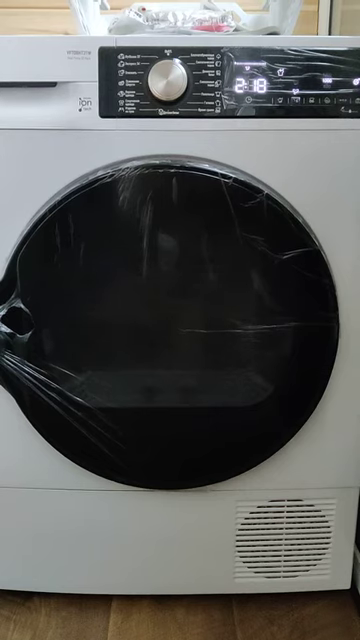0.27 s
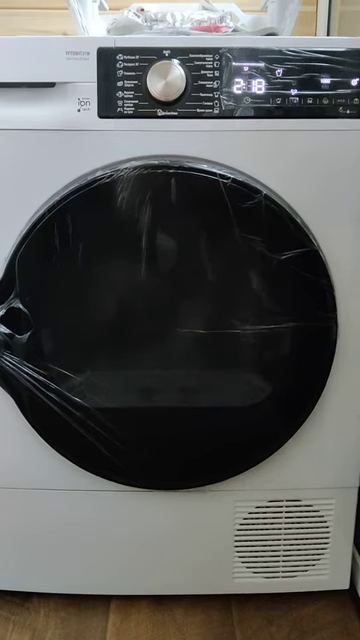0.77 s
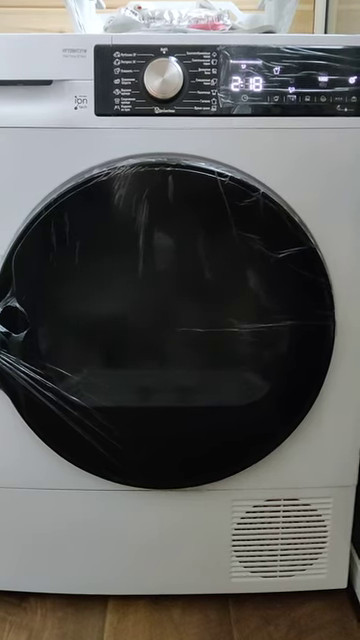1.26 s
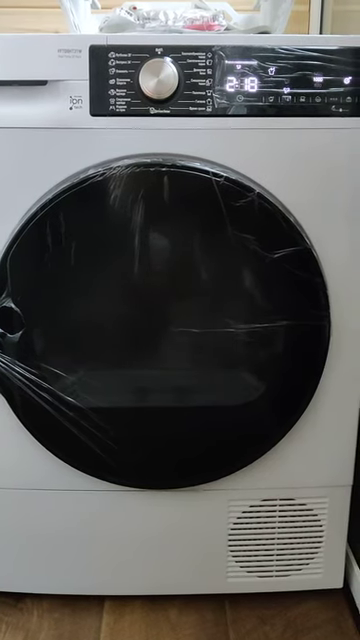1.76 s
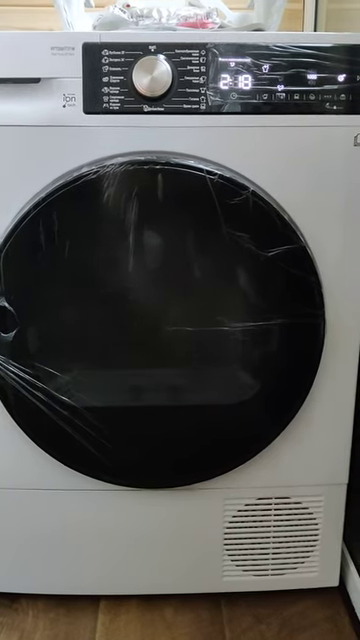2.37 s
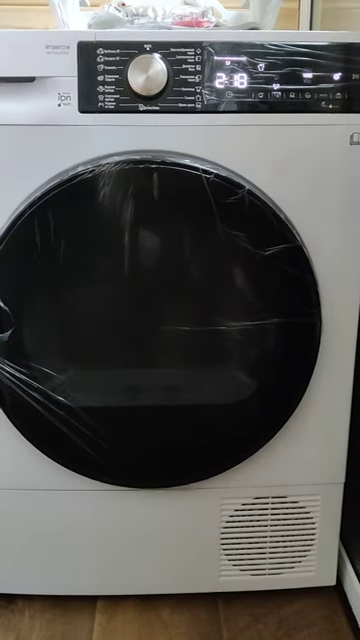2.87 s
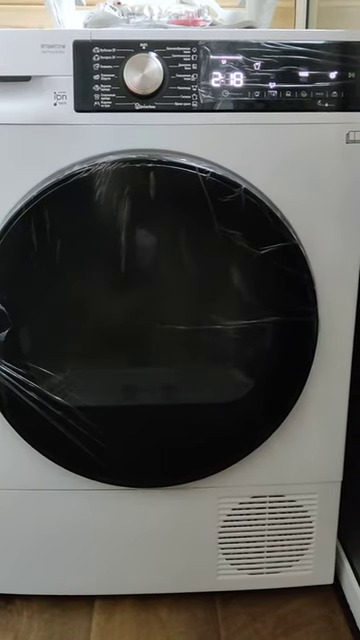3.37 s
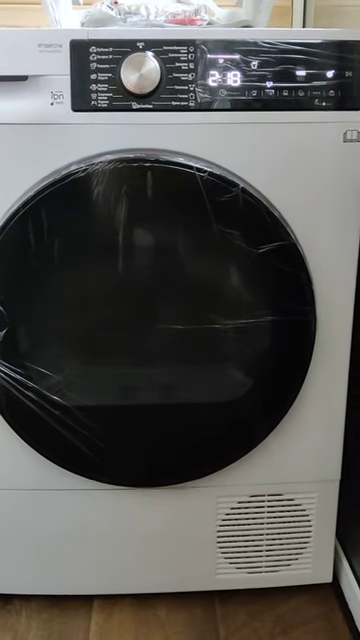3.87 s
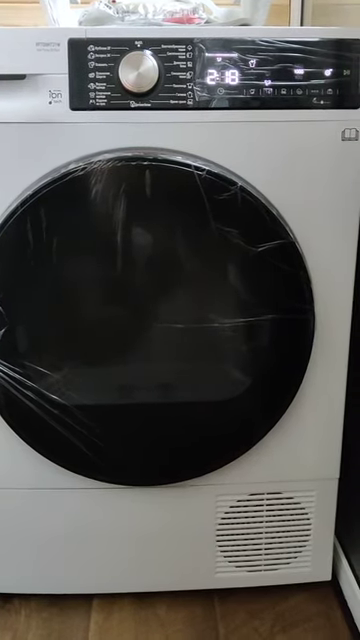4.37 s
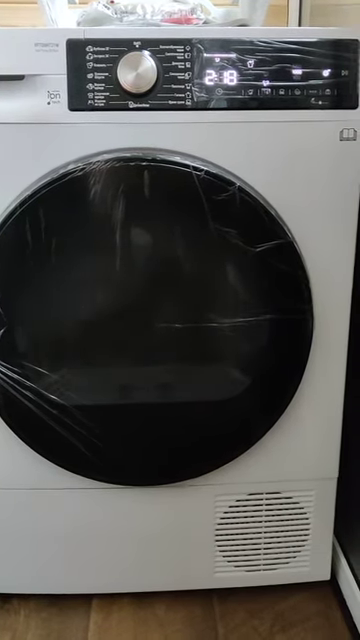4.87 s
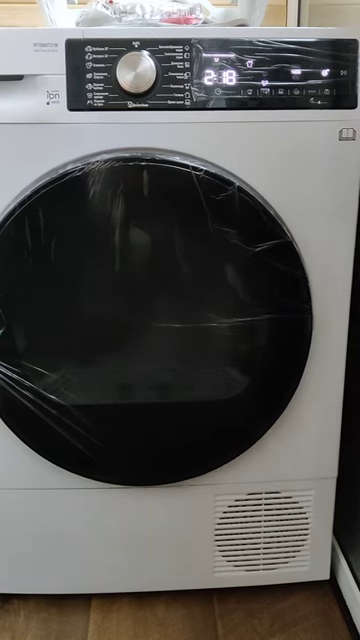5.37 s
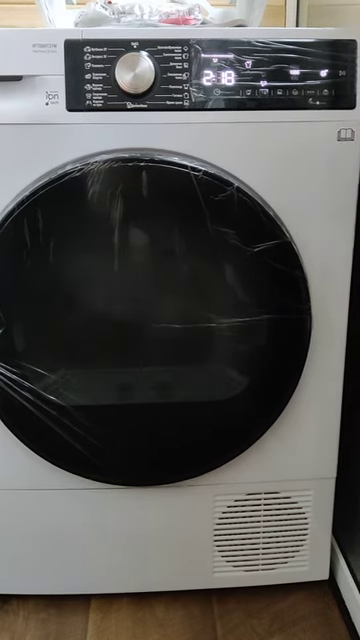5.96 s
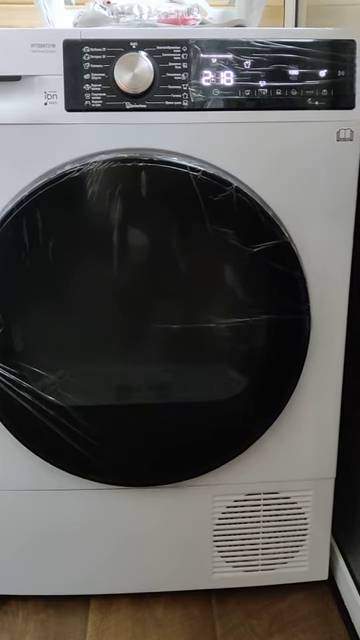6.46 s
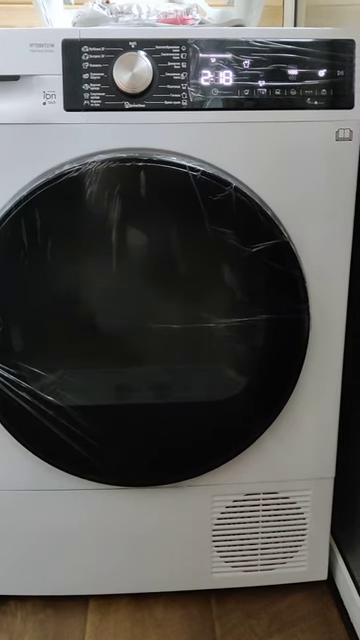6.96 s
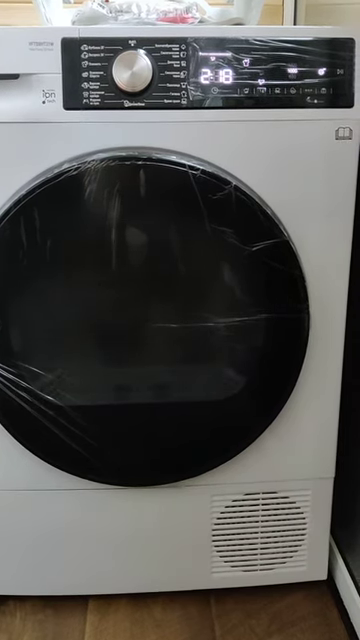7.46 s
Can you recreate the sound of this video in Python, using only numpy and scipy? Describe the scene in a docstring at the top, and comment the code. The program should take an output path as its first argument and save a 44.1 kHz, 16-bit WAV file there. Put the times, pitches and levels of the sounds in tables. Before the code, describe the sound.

A heat-pump clothes dryer runs steadily in a small room, heard by a stereo phone close in front. After a quick fade from silence, a deep boomy throb swells about three times a second as wet laundry drops in the drum. Under and around it lie motor hum and a soft, dark rush of air; a faint, thin high whine sits mostly on the right. One small dry tick comes late.

```python
"""A low, throbbing boom and a broad rush of air fade in: a heat-pump clothes dryer in a small room.
The drum's boom swells at each drop of the laundry and is made of two low tones of wandering pitch.
The rush of air is shaped noise, some of it ringing in cabinet, ducts and room; a thin whistle is narrow noise.
The compressor hums and whines in tones on multiples of its shaft speed, and one dry tick is a sudden step.
A phone with two microphones hears it all."""
import sys
import numpy as np
from scipy import signal
from scipy.fft import rfft, irfft, next_fast_len
from scipy.io import wavfile
from scipy.ndimage import uniform_filter1d, map_coordinates

SR = 44100
rng = np.random.default_rng(int(sys.argv[2]) if len(sys.argv) > 2 else 0)


def put_to_file(sound):
    """Save the sound as 16-bit audio at rate SR, in the file named by the first command-line argument."""
    columns = np.atleast_2d(sound).T  # one column per channel
    safe = np.clip(columns, -1, 1)
    whole_steps = np.round(safe * 32767)
    wavfile.write(sys.argv[1], SR, whole_steps.astype(np.int16))


N = 339570

# The stronger tones of the compressor's whine. Each row: multiple of the shaft speed, middle level in dB,
# left-right difference in dB, lead of the left side in turns.
WHINE_TONES = [(58, -63.5, -12.4, -0.38), (59, -55.9, -12.4, 0.45), (60, -76.0, 10.0, 0.09),
               (61, -76.5, -3.1, -0.3), (65, -75.9, -8.3, 0.26), (67, -77.5, -7.7, 0.18),
               (82, -77.9, 8.5, -0.12), (86, -81.1, 3.7, 0.35), (89, -79.9, -4.4, 0.27),
               (94, -78.4, 15.0, 0.42), (95, -78.7, 2.9, 0.29), (96, -78.9, 0.1, 0.45),
               (98, -73.3, -2.9, 0.27), (99, -73.4, -1.8, 0.42), (100, -80.7, -5.0, 0.44),
               (102, -74.1, -11.3, 0.21), (103, -74.0, 6.9, -0.12), (106, -79.7, -6.6, -0.41),
               (107, -79.0, 5.1, -0.07), (108, -78.1, 5.7, 0.21), (109, -80.7, 15.0, -0.21),
               (138, -81.3, 2.7, 0.38), (325, -84.8, -1.1, -0.05), (326, -86.6, 6.8, 0.42)]


def amp(db):
    """Turn decibels into gain."""
    return 10 ** (np.asarray(db) / 20)


def unit(x):
    """Scale x to an rms (average strength) of 1."""
    return x / np.sqrt(np.mean(x ** 2) + 1e-20)


def along(points, hz):
    """Read a curve of (Hz, value) points, joined by straight lines on a logarithmic frequency axis."""
    point_hz, values = np.transpose(points)
    return np.interp(np.log(hz + 1), np.log(point_hz + 1), values)


def curves(rows):
    """Draw one curve over time, sample by sample, for each column after the seconds."""
    seconds, *columns = np.transpose(rows)
    now = np.arange(N) / SR
    return [np.interp(now, seconds, column) for column in columns]


def wobble(rate):
    """Draw a smooth random curve through the given number of random points a second."""
    points = rng.standard_normal(int(N * rate / SR) + 4)
    return map_coordinates(points, [np.arange(N) * rate / SR])


def filtered(x, response):
    """Multiply the spectrum of x by a response that depends on frequency."""
    size = next_fast_len(N + 8192)
    spectrum = rfft(x, size) * response(np.fft.rfftfreq(size, 1 / SR))
    return irfft(spectrum, size)[..., :N]


def sides(pan_db):
    """Give the gains of left and right for a level difference; above 0 dB the left is louder."""
    return amp(np.array([pan_db / 2, -pan_db / 2]))


def pair(alike):
    """Give the rows that mix two unrelated noises into a left and right of a given likeness."""
    angle = np.arccos(np.clip(alike, -1, 1)) / 2
    return np.array([[np.cos(angle), np.sin(angle)], [np.cos(angle), -np.sin(angle)]])


def wavering(hz, waver_hz, rate):
    """Make a tone of rms 1 whose pitch wanders at random."""
    turns = np.cumsum(hz + waver_hz * wobble(rate)) / SR
    return np.sqrt(2) * np.sin(2 * np.pi * (turns + rng.random()))


def whistle():
    """A thin whistle of air is a narrow band of noise that grows and flutters, louder on the left."""
    # Each row: time in seconds, level in dB before the flutter and the left-right difference.
    whistle_growth = [(0, -84), (2, -78), (6.5, -74), (7.7, -72)]
    centre_hz, width_hz = 10110, 130
    band = lambda hz: 1 / (1 + (2 * (hz - centre_hz) / width_hz) ** 2)
    noise = unit(filtered(pair(.4) @ rng.standard_normal((2, N)), band))
    level = amp(curves(whistle_growth)[0] + 3 * wobble(14))
    return noise * sides(6)[:, None] * level


def airflow():
    """Turbulent air is a broad rush, plus noise ringing in each resonance, in patches of random strength."""
    # The color of the broad rush. Each row: frequency in Hz, relative level in dB per Hz.
    rush_color = [(10, -29), (40, -2.5), (90, 0), (200, -13), (420, -22), (800, -31), (1500, -31),
                  (2300, -40), (3400, -43.5), (5000, -44), (7000, -51), (9000, -56), (13000, -59.5),
                  (16000, -58)]
    # Likeness of the rush on both sides. Each row: frequency in Hz, likeness from 0 to 1.
    rush_likeness = [(60, 1), (330, 0.96), (600, 0.27), (1000, 0.97), (1600, 0.064), (15000, 0.038)]
    # Balance of the rush. Each row: frequency in Hz, left-right difference in dB.
    rush_balance = [(60, 0.5), (130, 5.5), (290, -4), (640, -3), (1410, -10.5), (3100, -0.5), (6820, -0.5),
                    (15000, 2)]
    # Resonances of cabinet, ducts and room. Each row: center in Hz, width in Hz, level in dB before balance,
    # ripple and patches, left-right difference in dB, likeness from 0 to 1, lead of the left side in turns.
    ringing_modes = [(19, 20, -41.5, -4, 1, 0.056), (35.9, 5, -33, 2, 1, -0.031),
                     (127.2, 7.6, -42, 1, .95, 0), (174.5, 8.5, -47.5, -2, 0.8, -0.05),
                     (203.1, 24.8, -37, -1, 0.95, -0.03), (238.3, 20.4, -43.5, 0, 1, 0),
                     (283.3, 38, -43, -0.5, 1, -0.03), (340.8, 15.3, -49, -1, 1, -0.035),
                     (374, 49, -54, -4, 0.9, -0.09), (563, 9, -56, -2.5, 0.9, -0.1),
                     (630, 73, -55.5, 1.5, 0.99, 0.48), (686, 24, -58.5, -6, .8, 0.13),
                     (707.6, 55, -51, 7.5, 0.94, -0.14), (822, 94, -56.5, 6, 0.7, -0.13),
                     (944, 73, -52, 5.5, 0.85, -0.15), (1052, 173, -51, -7.5, 0.86, -0.014),
                     (1168, 50, -52.5, -13, 0.94, -0.25), (1213, 100, -47.5, -7.5, 0.74, -0.34),
                     (1276, 38, -48.5, -8, 0.99, 0.46), (1319.8, 38, -50, -12.5, 0.98, 0.34),
                     (1374, 60, -54.5, -0.5, 0.8, -0.48), (1462, 16, -59, -1, .95, -0.12),
                     (1493, 59, -57.5, -2, 0.9, -0.037), (1600, 110, -59.5, 1, 0.9, 0.36),
                     (1753, 100, -57.5, -13, 0.54, 0.34), (1917, 170, -61.5, -8.5, 0.96, 0.027),
                     (2140, 160, -63, 1.5, .95, 0.27), (4980, 600, -69, 3, 0.1, 0.06),
                     (6520, 1100, -67.5, 8, 0.3, 0.39), (11770, 250, -83, 13, .3, 0),
                     (15500, 250, -73, 1, .3, -.2)]
    rush_db, left_delay_s = -28.5, .00008

    size = next_fast_len(N)
    hz = np.fft.rfftfreq(size, 1 / SR)

    def noise(shape):
        """Two unrelated random spectra of the given shape and equal overall strength."""
        random_bins = rng.standard_normal((2, len(hz), 2)) @ [1, 1j]
        return shape / np.linalg.norm(shape) * random_bins

    rush = (pair(along(rush_likeness, hz)) * noise(amp(along(rush_color, hz)))).sum(axis=1)
    total = amp(rush_db) * sides(along(rush_balance, hz)) * rush
    total[0] *= np.exp(-2j * np.pi * hz * left_delay_s)

    for centre_hz, width_hz, db, pan_db, alike, lead in ringing_modes:
        peak = 1 / (1 + (2 * (hz - centre_hz) / width_hz) ** 2)
        placing = sides(pan_db) * [np.exp(2j * np.pi * lead), 1]
        total += amp(db) * placing[:, None] * (pair(alike) @ noise(peak))

    # reflections in the room leave a fine, fixed ripple of peaks and dips at each microphone
    ripple = [np.interp(hz, 18 * np.arange(1300), rng.standard_normal(1300)) for side in total]
    ripple_db = along([(300, 0.085), (600, .8), (1600, .8), (2200, 1.6), (9000, 0.88)], hz)
    total *= amp(ripple_db * ripple)
    steady_air = irfft(total, size)[:, :N] * size / 2

    # strengthen and weaken small patches of time and frequency, the same on both sides
    frames = signal.stft(steady_air, nperseg=1024)[2]
    patches = rng.standard_normal(frames.shape[1:])
    patches = uniform_filter1d(uniform_filter1d(patches, 8, 0), 5, 1)
    depth_db = along([(300, 0.93), (2500, 1.1), (9000, 2.06)], np.fft.rfftfreq(1024, 1 / SR))[:, None]
    return signal.istft(frames * amp(depth_db * unit(patches)), nperseg=1024)[1][:, :N]


def tick():
    """One dry tick: the waveform climbs a little, drops at once and creeps back."""
    # Time in seconds, size of the step in dB before balance, left-right difference in dB.
    tick_settings = (5.385, -19.8, 2)
    at_s, step_db, pan_db = tick_settings
    since = np.arange(N) / SR - at_s
    step = -amp(step_db) / 2 * np.sign(since) * np.exp(-np.abs(since) / .002)  # creeps back over about 2 ms
    return step * sides(pan_db)[:, None]


def valves(turns):
    """The valves snap once a turn, the same each time, which adds faint tones on multiples of the shaft."""
    # Each row: multiple of the shaft speed, middle level in dB of each faint tone.
    faint_levels = [(50, -100), (54, -86), (62, -84), (110, -84), (150, -94), (330, -99.5), (340, -120)]
    order = np.arange(1025)
    faint = ~np.isin(order, np.transpose(WHINE_TONES)[0])  # the strong tones sound on their own
    # partly shared random phases scatter the snap and make the sides a little different
    scatter = 0.22 * rng.standard_normal(1025) + 0.26 * rng.standard_normal((2, 1025))
    level = amp(along(faint_levels, order) + 1.6 * rng.standard_normal((2, 1025)))
    snap = irfft(level * np.exp(2j * np.pi * scatter) * faint) * 1024 * np.sqrt(2)
    turn_points = np.arange(2048) / 2048
    return np.array([np.interp(turns % 1, turn_points, side, period=1) for side in snap])


def compressor():
    """Whining tones follow the turning shaft and flutter, each with its own place, beside low motor hums."""
    # Speed of the shaft before its slight wander. Each row: time in seconds, turns a second.
    shaft_speed = [(0, 47.825), (7.7, 47.79)]
    # Low tones of the motors. Each row: middle pitch in Hz, middle level in dB.
    motor_hums = [(47.4, -38.5), (148, -37.5)]
    turns = np.cumsum(curves(shaft_speed)[0] + .004 * wobble(2)) / SR
    total = valves(turns)
    for order, db, pan_db, lead in WHINE_TONES:
        phase = 2 * np.pi * (order * turns + rng.random() + np.array([[lead], [0]]))
        level = amp(db + .8 * wobble(4))
        total += level * unit(sides(pan_db))[:, None] * np.sqrt(2) * np.sin(phase)
    for hz, db in motor_hums:
        total += amp(db + 2.3 * wobble(3)) * wavering(hz, waver_hz=0.41, rate=2.5)
    return total


def booms():
    """The drum's two strongest low resonances hum on and swell at each drop; both sides get the same wave."""
    # Wet laundry drops off the drum's lifters about three times a second. Each row: time in seconds,
    # lower boom in dB, upper boom in dB (both before flutter and balance), lower middle pitch in Hz,
    # upper middle pitch in Hz.
    laundry_drops = [(0.362, -26, -26, 67.95, 101.5), (0.7, -24.5, -25, 70.6, 106.4),
                     (1.05, -42, -21, 76.4, 100.7), (1.292, -20.5, -24, 71.4, 105.3),
                     (1.66, -24.5, -23, 72.8, 100.6), (2.042, -23.5, -22, 72.93, 105.6),
                     (2.36, -25, -23.5, 71.65, 109.5), (2.709, -20, -27, 73.3, 102.4),
                     (3.08, -25.5, -25, 72.7, 102.1), (3.4, -22.5, -20.5, 73.4, 104.3),
                     (3.75, -23, -22.5, 73.3, 106.1), (4.17, -26, -24.5, 72.74, 98.8),
                     (4.38, -23, -29, 72.6, 102.5), (4.57, -22.5, -33, 71.74, 101.5),
                     (4.99, -27, -31, 73.5, 101.5), (5.35, -28, -27, 73.92, 105.5),
                     (5.57, -20, -31, 70.65, 106.1), (6.06, -26, -25.5, 71.6, 99.47),
                     (6.32, -20, -27, 72.4, 100.6), (6.59, -22.5, -29, 72, 102.6),
                     (6.83, -17, -30, 72.9, 104.9), (7.24, -26, -25.5, 76.4, 100.6),
                     (7.53, -38, -30, 72.4, 103.5)]
    # Lower and upper boom between the drops, in dB before flutter and balance.
    steady_levels = (-33, -32.5)
    # Three short swells of tone of wavering pitch, two faint and brief, one longer and lower.
    # Each row: time in seconds, middle pitch in Hz, level in dB before balance, half width in seconds.
    swell_rows = [(2.212, 691, -43, 0.021), (2.24, 565, -44, 0.027), (5.5, 202.2, -31, 0.12)]
    rise_s, fall_s = 0.092, 0.082  # half widths of the bell of power at each drop

    drop_s, lower_db, upper_db, lower_pitch, upper_pitch = np.transpose(laundry_drops)
    coarse_s = np.arange(0, N, 64) / SR  # the slow swell needs only every 64th sample
    since = coarse_s - drop_s[:, None]
    bell = np.exp(-(since / np.where(since < 0, rise_s, fall_s)) ** 2)
    power = amp(steady_levels)[:, None] ** 2 + amp([lower_db, upper_db]) ** 2 @ bell

    now = np.arange(N) / SR
    lower_level, upper_level = (np.interp(now, coarse_s, np.sqrt(p)) for p in power)
    lower_hz = np.interp(now, drop_s, lower_pitch)
    upper_hz = np.interp(now, drop_s, upper_pitch)
    lower = lower_level * amp(2.2 * wobble(11)) * wavering(lower_hz, waver_hz=3, rate=14)
    upper = upper_level * amp(1.8 * wobble(30)) * wavering(upper_hz, waver_hz=7.52, rate=30)

    total = lower + upper
    for at_s, hz, db, half_s in swell_rows:
        swell_bell = np.exp(-((now - at_s) / half_s) ** 2)
        total += amp(db) * swell_bell * wavering(hz, waver_hz=4.05, rate=12)
    return total * sides(-1.13)[:, None]


def scene():
    """Add up all sources at the two microphones."""
    return whistle() + airflow() + tick() + compressor() + booms()


def record(dry):
    """The phone opens from silence and fades in, the bass a little late, with nothing above a top limit."""
    # Each row: time in seconds, gain in dB above the bass, gain in dB of the bass.
    # The first time is also when the sound opens.
    fade_gains = [(.0955, -20, -31), (.17, -14, -17), (.25, -7.5, -8), (.4, -3.5, -3.5), (.6, -1.5, -1.5),
                  (.8, 0, 0)]
    bass_hz, top_hz = 300, 15770
    opened = np.arange(N) / SR >= fade_gains[0][0]
    gain, bass_gain = amp(curves(fade_gains))
    bass = filtered(dry, lambda hz: 1 / (1 + (hz / bass_hz) ** 4))
    faded = ((dry - bass) * gain + bass * bass_gain) * opened
    # a mirrored tail keeps the filter from hearing a sudden end
    with_tail = np.hstack([faded, faded[:, :-4096:-1]])
    return filtered(with_tail, lambda hz: hz < top_hz)


dry = scene()
out = record(dry)
put_to_file(out)
```